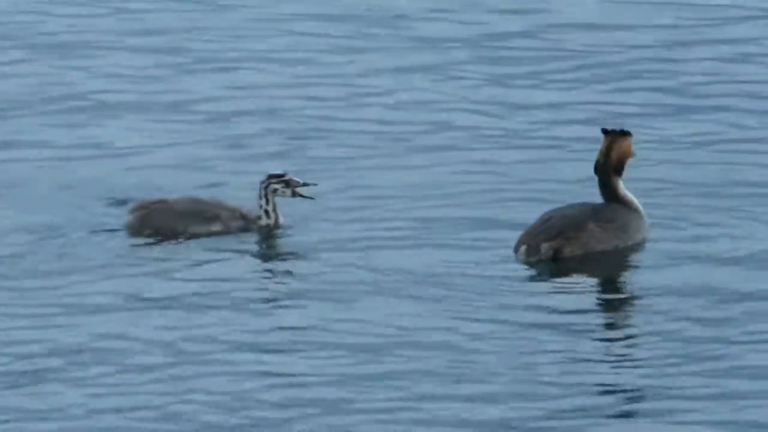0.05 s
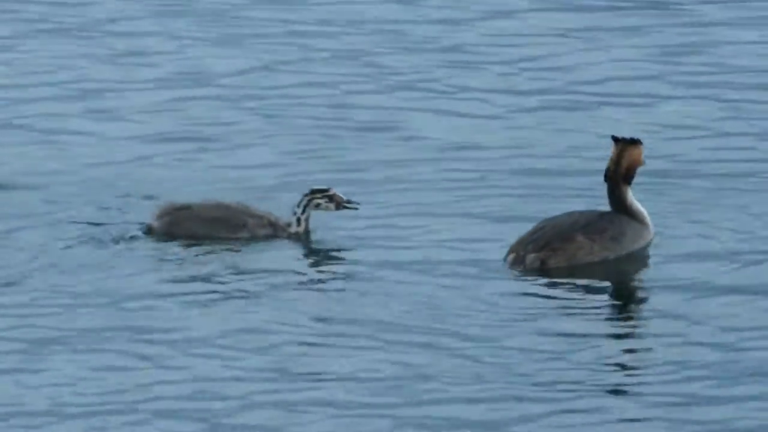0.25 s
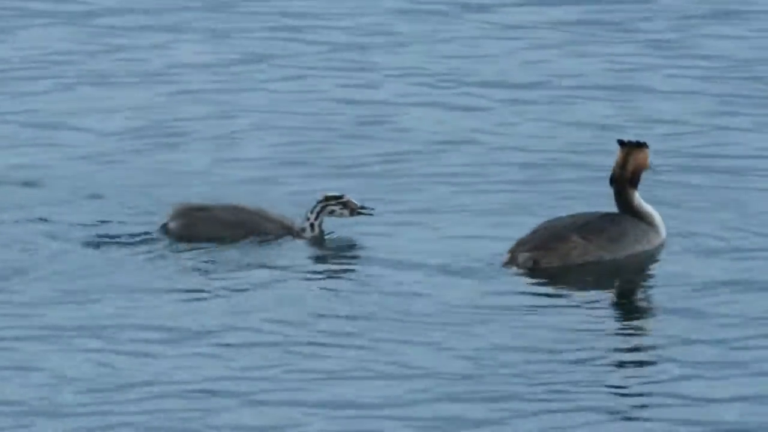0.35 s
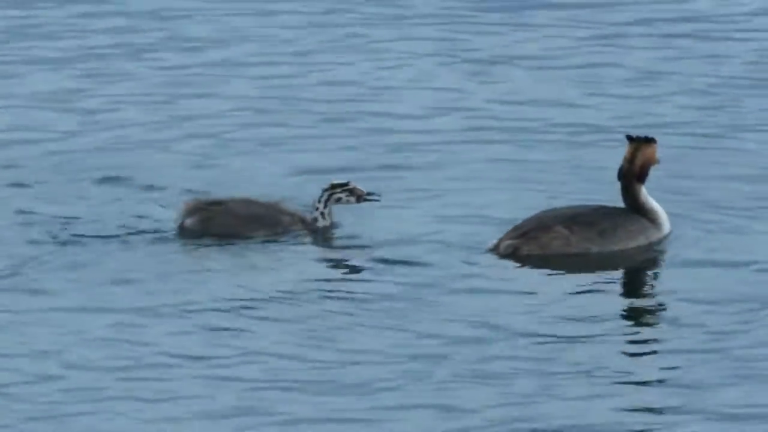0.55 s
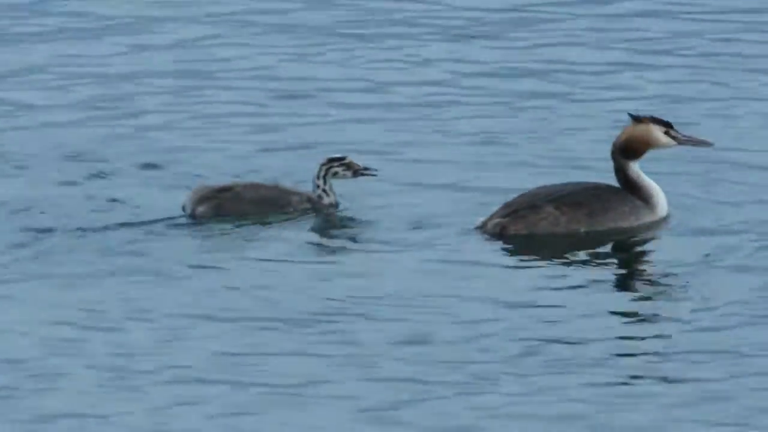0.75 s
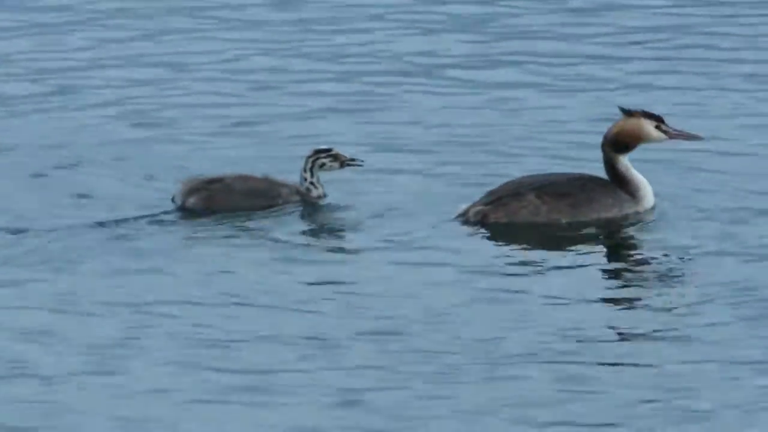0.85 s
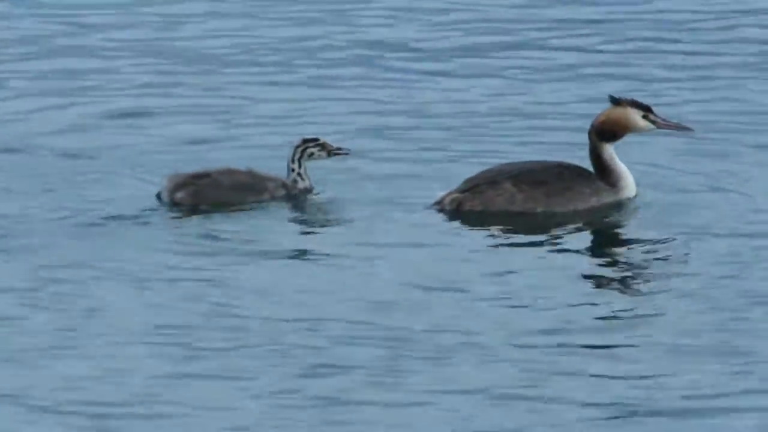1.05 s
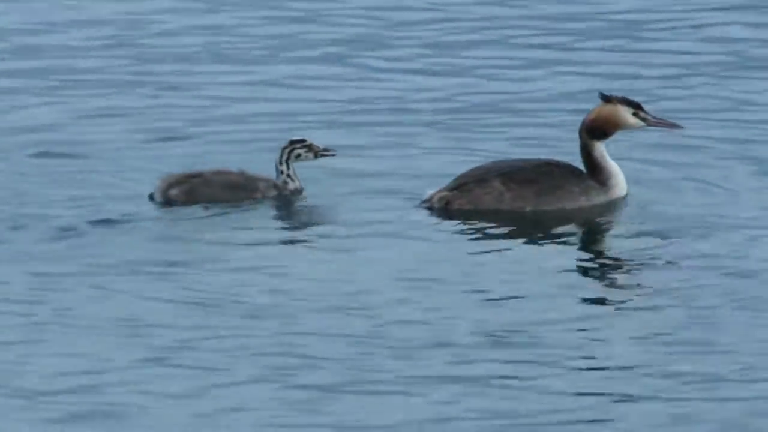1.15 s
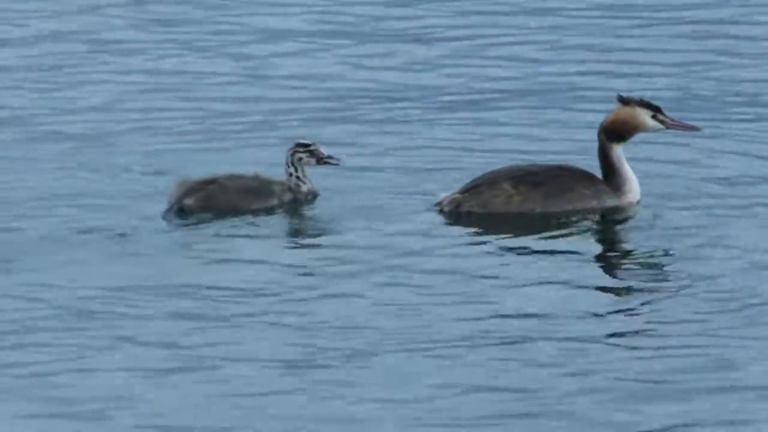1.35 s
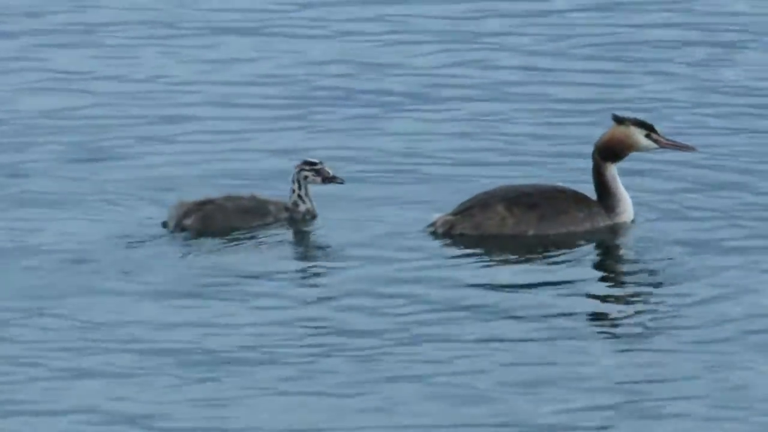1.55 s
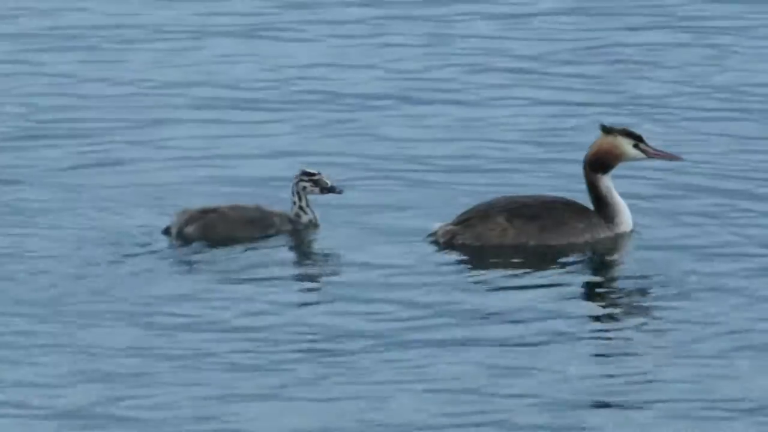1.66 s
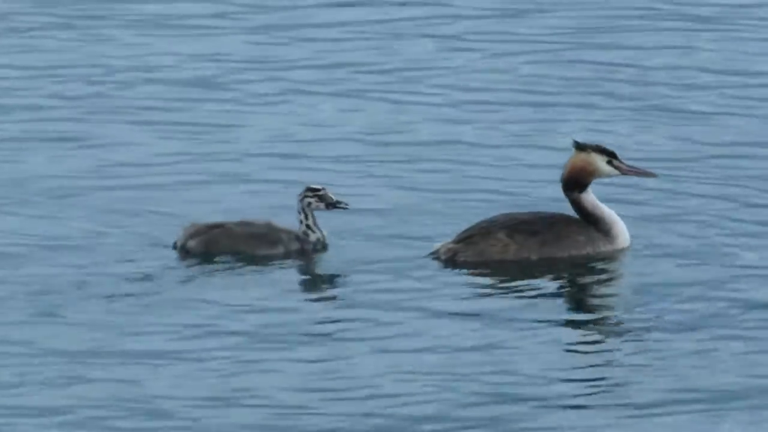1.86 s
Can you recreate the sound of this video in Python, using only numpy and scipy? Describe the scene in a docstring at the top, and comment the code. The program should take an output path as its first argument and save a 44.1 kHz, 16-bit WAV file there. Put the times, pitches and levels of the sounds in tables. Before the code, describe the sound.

A young waterbird peeps rapidly in high gliding calls while wind gusts thump the microphone on a lake

```python
"""A young waterbird peeps at once: its calls glide up, flip into higher registers and drop back.
Each note is a few sine partials on a drawn pitch, with a faint echo from the far shore of the lake.
Gusts thump the two microphone ports: filtered noise and short low wobbles over a deep rumble.
Nearby wavelets tick, plop and fizz as noise bursts and decaying sines.
Behind them lies a distant hush of water and air, made of smooth filtered noise."""
import sys
import numpy as np
from scipy import signal
from scipy.fft import rfft, irfft
from scipy.io import wavfile
from scipy.ndimage import uniform_filter1d

SR = 44100
rng = np.random.default_rng(int(sys.argv[2]) if len(sys.argv) > 2 else 0)


def bounce(signal):
    """Save signal as a 16-bit WAV file at the path given by the first command-line argument."""
    frames = np.transpose(np.atleast_2d(signal))
    limited = np.clip(frames, -1, 1)
    pcm = np.round(limited * 32767).astype(np.int16)
    wavfile.write(sys.argv[1], SR, pcm)


def gain_from_db(level_db):
    """Turn a decibel level (scalar or array-like) into a linear amplitude factor."""
    decades = np.asarray(level_db, float) / 20
    return 10 ** decades


N = 83790  # samples, 1.9 s

# Distant hush, tone of the common part: freq_hz, relative_db
HUSH_TONE = [(18, -54.5), (30, -19), (148, -4.5), (369, -5.5), (410, -3.5), (970, -5), (1050, -7),
             (1550, -10), (2020, -12), (9680, -42), (15500, -58)]
# Hush, left-right part against the common part: freq_hz, relative_db
HUSH_SIDE_TONE = [(60, -46.5), (110, -45), (200, -34.5), (380, -66), (700, -83), (1290, -23.5), (2380, -11),
                  (4400, -3.5), (8120, 1), (15000, 11)]
# Slow swell of the hush, also steering the scattered droplets: time_s, relative_db
SWELL_CURVE = [(0, 3), (.25, 2), (.33, 1.5), (.45, 4.5), (.6, 5.5), (.8, 4), (1.0, 4), (1.2, 4.5), (1.4, 3),
               (1.7, 2), (1.9, 1.5)]
# Treble tone shared by hush, fizz and water: freq_hz, gain_db
TREBLE_TONE = [(9000, 0), (12000, 4), (15000, -10.5), (16000, -30)]

# Soft fizz after wavelets break: peak_s, level_db, half_width_s (to 1/e)
FIZZ_PATCHES = [(.428, -59, 0.013), (.575, -60.5, 0.035), (.68, -58, 0.024), (.95, -61, .015),
                (1.17, -65.5, 0.013), (1.28, -66.5, 0.043)]
# Tone of the fizz: freq_hz, relative_db
FIZZ_TONE = [(2500, -20.5), (4500, 3), (14000, -16.5)]

# Water ticks close by, before the treble tone: start_s, level_db, centre_hz, rise_s (at least 0.0003)
WATER_TICKS = [(0.052, -62.5, 12000, 0.00086), (.058, -58, 12000, .0015), (.387, -67, 9000, 0.0011),
               (0.422, -57, 4940, 0.0012), (0.422, -56.5, 5550, .003), (0.484, -51, 4900, 0.0024),
               (0.54, -59, 6500, .001), (0.5522, -34.5, 2870, 0.00092), (.5525, -52, 10000, 0.0013),
               (0.557, -38.5, 3740, 0.0034), (0.561, -55.5, 9800, 0.0035), (.597, -39.5, 4700, 0.001),
               (0.596, -51, 12900, 0.0017), (0.601, -41.5, 10500, 0.00045), (0.628, -44, 2800, 0.0058),
               (.658, -60, 10000, .002), (0.673, -47.5, 4460, 0.0037), (0.949, -40, 2940, 0.0027),
               (1.089, -55.5, 4940, .003), (1.167, -53, 4700, 0.0035), (1.169, -62, 11000, .003),
               (1.635, -66, 6400, .002), (1.727, -56.5, 5500, 0.0056), (1.747, -62, 5560, .004),
               (1.777, -64, 10000, 0.0022)]
# Small bubbles, before the treble tone: start_s, peak_db, start_pitch_hz
BUBBLES = [(0.03, -30.5, 1223), (.204, -36, 1900), (0.427, -32, 992), (.544, -30, 1950),
           (.565, -30.5, 2560), (.811, -31.5, 2090), (0.95, -27.5, 1295), (1.014, -31, 1020),
           (1.089, -30, 1990), (1.159, -31, 1330), (1.191, -34, 1160), (1.4, -33, 2030),
           (1.428, -30.5, 850),]

# Strength of the gust, before its trim: time_s, relative_db
GUST_CURVE = [(0.0, -35), (0.074, -44.5), (0.21, -39), (0.248, -14), (0.312, -38), (0.332, -18),
              (0.444, -38.5), (0.486, -20), (0.55, -30.5), (0.592, -9), (0.618, -26.5), (0.788, -11.5),
              (0.888, -19), (0.904, -23.5), (0.984, -13), (1.01, -15.5), (1.316, -34.5), (1.344, -33.5),
              (1.406, -44), (1.422, -39), (1.48, -28), (1.528, -34), (1.57, -37), (1.608, -52),
              (1.852, -68), (1.9, -34.5)]
# Tone of the gust: freq_hz, relative_db
GUST_TONE = [(25, -53), (60, -41), (120, -6), (200, -2), (400, -5.5), (490, -4.5), (540, -31.5),
             (800, -38.5), (2500, -66), (6000, -98)]
# Wind, filter on the left-right part: freq_hz, gain_db
WIND_SIDE_TONE = [(60, -50), (125, -37.5), (250, -21.5), (500, -13), (1000, -3), (2500, 15)]
# Rough upper band of the gust, before its trim: time_s, relative_db
RASP_CURVE = [(0.0, -66), (0.226, -50), (0.254, -26.5), (0.284, -72.5), (0.332, -34.5), (0.46, -68),
              (0.492, -28.5), (0.528, -70), (0.598, -31.5), (0.618, -46), (0.718, -28.5), (0.74, -55),
              (0.82, -22.5), (0.952, -47.5), (1.062, -24), (1.11, -52), (1.18, -35.5), (1.2, -66.5),
              (1.418, -62.5), (1.434, -42), (1.46, -64), (1.9, -68.5)]
# Tone of that band: freq_hz, relative_db
RASP_TONE = [(400, -14.5), (500, 3), (700, 0), (900, -12), (1300, -29.5), (2500, -53.5), (6000, -88.5)]
# Deep rumble, before its trim: time_s, relative_db
RUMBLE_CURVE = [(0.0, -49.5), (0.508, -41.5), (0.544, -57), (0.612, -35), (0.824, -48.5), (0.866, -42),
                (1.518, -45), (1.56, -39), (1.598, -53.5), (1.9, -66.5)]
# Tone of the rumble: freq_hz, relative_db
RUMBLE_TONE = [(20, -37), (40, -12), (60, -1), (90, 5), (130, 6), (200, 1), (300, -48), (2000, -87)]
# Strongest thumps, before the thump tone: peak_s, peak_db, centre_hz, width_s (at half height)
PORT_THUMPS = [(0.0053, -23.5, 260, 0.0041), (0.1449, -28, 395, 0.0029), (0.244, -11, 340, 0.0034),
               (0.2559, -12.5, 305, 0.012), (0.293, -22.5, 260, 0.0078), (0.3381, -12, 420, 0.003),
               (0.3702, -18, 295, 0.0021), (0.42, -28, 238, 0.0072), (0.48, -17, 344, 0.0055),
               (0.4943, -13, 374, 0.006), (0.5243, -17, 248, 0.0048), (0.541, -12.5, 324, 0.0026),
               (0.5718, -12, 381, 0.0031), (0.5935, -9, 352, 0.0031), (0.61, -21, 330, 0.005),
               (0.6434, -11, 302.0, 0.0032), (0.6582, -23, 289, 0.027), (0.6652, -10.5, 312, 0.0044),
               (0.6961, -20, 272, 0.013), (0.7144, -9.5, 364, 0.0088), (0.731, -25, 280, 0.0042),
               (0.7427, -9.5, 390, 0.0052), (0.7647, -7, 381, 0.0035), (0.7831, -14.5, 291, 0.0055),
               (0.7932, -6.5, 401, 0.0049), (0.8235, -8, 370, 0.0026), (0.8366, -5.5, 289, 0.0014),
               (0.871, -18.5, 287, 0.0031), (0.9037, -7, 346, 0.0028), (0.9152, -10.5, 248, 0.0041),
               (0.9416, -10.5, 390, 0.0046), (1.0036, -17.5, 322, 0.012), (1.0157, -7.5, 277, 0.0052),
               (1.036, -13.5, 285, 0.0047), (1.0557, -9.5, 296, 0.0014), (1.0688, -4, 338, 0.0021),
               (1.109, -8, 342, 0.0029), (1.125, -14, 289, 0.0057), (1.1427, -16, 228.0, 0.0044),
               (1.1881, -26.5, 217, 0.0094), (1.2084, -15, 289, 0.002), (1.215, -25.5, 342, 0.0099),
               (1.255, -23, 226, 0.0039), (1.279, -30, 211.0, 0.0058), (1.302, -29, 300, 0.005),
               (1.3359, -19, 370, 0.0038), (1.3522, -17.5, 183, 0.0059), (1.3874, -22, 279, 0.0082),
               (1.398, -17.5, 313, 0.0028), (1.4573, -17.5, 244, 0.0031), (1.4801, -17, 243, 0.0052),
               (1.5646, -23.5, 291, 0.0032), (1.5743, -30.5, 211, 0.0052)]
# Sharp upper edges of the hardest thumps, before trim and thump tone: start_s, peak_db, centre_hz
THUMP_SLAPS = [(0.248, -29.5, 713), (0.333, -28.5, 832), (0.489, -30.5, 670), (0.702, -21, 773),
               (0.79, -19.5, 643), (0.856, -19.5, 657), (0.901, -18.5, 638), (1.014, -14.5, 600),
               (1.171, -30, 654)]
# Tone of thumps and slaps: freq_hz, gain_db
THUMP_TONE = [(30, -31.5), (70, -10), (130, 2.5), (490, -0.5), (560, -8.5), (900, -0.5), (1500, -31),
              (5000, -79)]

# Bird notes by register, a list of points per note: time_s, pitch_hz, level_db (before the partials)
LOW_CALLS = [
    [(0.0, 2050, -47), (0.008, 2204, -50), (0.024, 2420, -43), (0.03, 2580, -41)],
    [(0.253, 2274, -60), (0.257, 2220, -44.5), (0.264, 1888, -55)],
    [(0.368, 1561, -56), (0.382, 1880, -45.5), (0.398, 2105, -45.5), (0.42, 2435, -44)],
    [(0.503, 2142, -51), (0.509, 2136, -47.5), (0.531, 1979, -56), (0.548, 1767, -58), (0.568, 1404, -45)],
    [(0.678, 1921, -45.5), (0.698, 2133, -47), (0.712, 2406, -44), (0.718, 2580, -41)],
    [(0.795, 2222, -47), (0.813, 2061, -49.5), (0.833, 1910, -48.5), (0.855, 1750, -56)],
    [(0.902, 2020, -47), (0.908, 2204, -51.5), (0.914, 2364, -49), (0.921, 2630, -40.5)],
    [(0.998, 2230, -61), (1.02, 1870, -54), (1.035, 1895, -50), (1.05, 1870, -55)],
    [(1.155, 1970, -48), (1.161, 2047, -47), (1.19, 2565, -48.5)],
    [(1.253, 2323, -57), (1.283, 1947, -48.5), (1.305, 1880, -51.5), (1.312, 1819, -54)],
    [(1.432, 2055, -54), (1.44, 2270, -52), (1.451, 2510, -42)],
    [(1.678, 2530, -56), (1.684, 2230, -51), (1.694, 2060, -51), (1.702, 1880, -45)],
    [(1.856, 1681, -60), (1.866, 2030, -44), (1.88, 2360, -47), (1.887, 2550, -35.5)],
]
# Low notes that link two calls: time_s, pitch_hz, level_db
LINKING_CALLS = [
    [(0.113, 2376, -57), (0.119, 2288, -49), (0.149, 2280, -51), (0.181, 2122, -50), (0.199, 2147, -52.5),
     (0.221, 2486, -49), (0.226, 2580, -44)],
    [(1.502, 2410, -47.5), (1.542, 1874, -47), (1.556, 1503, -51), (1.572, 1550, -59), (1.588, 1902, -49),
     (1.61, 2007, -45), (1.62, 2323, -47.5), (1.629, 2570, -39)],
]
# Middle register: time_s, pitch_hz, level_db
MID_CALLS = [
    [(0.031, 3350, -38), (0.043, 3440, -38), (0.081, 3200, -38), (0.113, 2990, -51)],
    [(0.226, 3220, -40.5), (0.234, 3285, -37.5), (0.244, 3230, -37), (0.253, 2940, -47)],
    [(0.42, 3220, -38.5), (0.426, 3320, -31.5), (0.431, 3400, -56)],
    [(0.472, 3133, -36), (0.478, 3100, -35), (0.49, 2955, -43.5), (0.5, 2760, -52)],
    [(0.718, 3280, -38), (0.724, 3290, -37.5), (0.731, 3430, -52.5)],
    [(0.767, 3139, -41), (0.773, 3170, -35), (0.781, 2940, -44.5), (0.795, 2890, -45)],
    [(0.973, 3260, -37), (0.979, 3134, -34), (0.989, 3055, -45), (0.997, 2970, -45)],
    [(1.191, 3090, -39), (1.203, 3166, -33.5), (1.236, 3050, -38.5), (1.255, 2860, -52)],
    [(1.451, 3230, -39), (1.457, 3293, -37.5), (1.481, 3212, -35.5), (1.502, 2980, -44.5)],
    [(1.629, 3220, -41), (1.635, 3250, -33), (1.642, 3440, -53)],
    [(1.659, 3120, -33), (1.667, 3020, -39), (1.678, 2840, -47)],
    [(1.887, 3430, -39), (1.891, 3300, -43.5), (1.9, 3350, -32)],
]
# High register: time_s, pitch_hz, level_db
HIGH_CALLS = [
    [(0.431, 3815, -37.5), (0.441, 3820, -32), (0.461, 3700, -31), (0.472, 3520, -38)],
    [(0.731, 3740, -40.5), (0.737, 3786, -36), (0.757, 3679, -34.5), (0.767, 3610, -38)],
    [(0.922, 3740, -36), (0.936, 3844, -41), (0.964, 3700, -35), (0.973, 3510, -36.5)],
    [(1.642, 3710, -36), (1.65, 3630, -31), (1.659, 3540, -40)],
]
# Sine partials of each register: multiple of the pitch, relative_db
LOW_SINES = [(1, 4.5), (2, -7.5), (3, -44)]
MID_SINES = [(1, 2), (1.5, -23.5), (2, -33)]
HIGH_SINES = [(1, -1.5), (2, -48)]
# Extra strength of the overtones, one value per note: gain_db
LOW_BRIGHTNESS = [4.5, -4, -1.5, -4, -1, -5, 1, -5, -2, -5, 0, -4.5, -3, -1, -2]
MID_BRIGHTNESS = [7, -6, -2, -8, -2, -6, -6, -8, -5, -2, -2, -2]
# Throat resonance, on the overtones alone: freq_hz, gain_db
THROAT_TONE = [(3400, -14.5), (3900, 4), (4300, 5.5), (4700, 0), (5050, -11), (7000, -5)]


def curve(table, col=1):
    """A table column as one value per sample."""
    a = np.array(table, float)
    return np.interp(np.arange(N) / SR, a[:, 0], a[:, col])


def colour(x, *tables):
    """Filter by the sum of tables in Hz and dB, joined on a log frequency scale."""
    log_hz = np.log(np.fft.rfftfreq(N, 1 / SR) + 1)
    db = 0
    for table in tables:
        hz, gain_db = np.array(table).T
        db = db + np.interp(log_hz, np.log(hz), gain_db)
    return irfft(rfft(x) * gain_from_db(db), N)


def unit(x):
    """Scale to rms 1."""
    return x / np.sqrt(np.mean(x ** 2))


def walk(rate):
    """Smoothed noise of rms 1; a higher rate in Hz wanders faster."""
    k = int(SR / rate)
    smooth = uniform_filter1d(rng.standard_normal(N), k)
    return unit(uniform_filter1d(smooth, k))


def add(out, s, x):
    """Mix x in from time s."""
    i = int(s * SR)
    out[..., i:i + x.shape[-1]] += x[..., :max(N - i, 0)]


def spread(mid, side):
    """Left and right from the common and the left-right part."""
    return np.array([mid + side, mid - side])


def layer(table, tone, db, grit=1):
    """Coloured noise that follows a level curve, roughened by grit; its rms is the curve's plus db."""
    gain = gain_from_db(curve(table))
    noise = unit(colour(gain * grit * rng.standard_normal(N), tone))
    return gain_from_db(db) * np.sqrt(np.mean(gain ** 2)) * noise


def grain(hz, cycles, glide):
    """A decaying sine with a soft start, peak 1 at a third of its cycles; glide raises the pitch."""
    u = np.arange(int(3 * cycles / hz * SR)) * hz / SR / cycles
    shape = u * np.exp(1 - 3 * u) * 3
    return shape * np.sin(2 * np.pi * cycles * (u + glide * u ** 2 / 2))


def tick(hz, length):
    """A burst of noise around hz that peaks after length seconds and dies away, partly differing by side."""
    u = np.arange(1024) / SR / max(length, 3e-4)
    octaves = np.log2((np.fft.rfftfreq(1024, 1 / SR) + 1) / hz)
    band = np.exp(-.5 * (octaves / 0.42) ** 2)
    noise = irfft(rfft(rng.standard_normal((2, 1024))) * band) / np.sqrt(np.mean(band ** 2))
    mid, side = noise * u * np.exp(1 - u)
    return spread(mid, .6 * side)


def hush():
    """Distant water and air: smooth noise with a slow swell and a slight flicker."""
    flicker_db = .8 * walk(42)
    mid, side = rng.standard_normal((2, N)) * gain_from_db(curve(SWELL_CURVE) + flicker_db)
    norm = np.std(colour(rng.standard_normal(N), HUSH_TONE))
    mid = colour(mid, HUSH_TONE, TREBLE_TONE)
    side = colour(side, HUSH_TONE, HUSH_SIDE_TONE)
    return gain_from_db(-45.5) / norm * spread(mid, side)


def fizz():
    """Grainy treble noise that rises and fades in bell-shaped patches."""
    t = np.arange(N) / SR
    patches = sum(gain_from_db(db) * np.exp(-((t - s) / width) ** 2) for s, db, width in FIZZ_PATCHES)
    mid, side = (unit(colour(rng.standard_normal(N), FIZZ_TONE, TREBLE_TONE)) for _ in range(2))
    return patches * gain_from_db(2 * walk(200)) * spread(mid, .6 * side)


def water():
    """Wavelets close by: noise ticks, ringing bubbles, and faint laps and spray that follow the swell."""
    laps_per_s, lap_db = 300, -54
    spray_per_s, spray_db = 240, -82.5
    size_spread_db = 3
    out, swell_db = np.zeros((2, N)), 2.26 * curve(SWELL_CURVE)
    for s, db, hz, length in WATER_TICKS:
        add(out, s, gain_from_db(db) * tick(hz, length))
    for s, db, hz in BUBBLES:
        add(out, s, gain_from_db(db) * grain(hz, cycles=8.9, glide=0.027)[None])
    # chance size: many weak drops, few strong ones
    for when, pitch, size, pan in rng.random((int(laps_per_s * N / SR), 4)):
        db = lap_db + swell_db[int(when * N)] - size_spread_db * np.log(1 - .97 * size)
        lap = gain_from_db(db) * grain(900 * 3.5 ** pitch, cycles=4.3, glide=0.18)
        add(out, when * N / SR, spread(lap, .4 * (pan - .5) * lap))
    for when, pitch, size in rng.random((int(spray_per_s * N / SR), 3)):
        db = spray_db + swell_db[int(when * N)] - size_spread_db * np.log(1 - .97 * size)
        add(out, when * N / SR, gain_from_db(db) * tick(3500 * 2.5 ** pitch, 0.0023))
    return colour(out, TREBLE_TONE)


def buffets():
    """Eddies of uneven size: chance hits smeared over 300 samples into a rough gain of rms 1."""
    hits_per_s, size_spread_db = 470, 3.5
    hit = (rng.random(N) < hits_per_s / SR) * gain_from_db(size_spread_db * rng.exponential(size=N))
    return unit(np.abs(uniform_filter1d(hit, size=300)) ** .5)


def port_thumps():
    """The biggest eddies: bell-shaped low wobbles with a chance phase at each port, and sharp slaps."""
    thumps, u = np.zeros((2, N)), np.arange(-900, 900) / SR
    for s, db, hz, width in PORT_THUMPS:
        bell = gain_from_db(db) * np.exp(-4 * np.log(2) * (u / width) ** 2)
        wobble = np.sin(2 * np.pi * (hz * u + rng.random((2, 1))))
        rough = gain_from_db(-15.5) * rng.standard_normal((2, len(u)))
        # a bell that would start before time 0 is shifted to start there
        add(thumps, max(s + u[0], 0), bell * (wobble + rough))
    for s, db, hz in THUMP_SLAPS:
        add(thumps, s, gain_from_db(db - 1.5) * grain(hz, cycles=5.2, glide=0)[None])
    return colour(thumps, THUMP_TONE)


def wind():
    """Gust noise and thumps at the two microphone ports over a deep rumble common to both."""
    hit = buffets()
    pair = np.array([layer(GUST_CURVE, GUST_TONE, -5, hit) + layer(RASP_CURVE, RASP_TONE, -2.5, hit)
                     for _ in range(2)])
    mid, other = pair + port_thumps()
    rumble = layer(RUMBLE_CURVE, RUMBLE_TONE, 4.5)
    return spread(mid + rumble, colour(other, WIND_SIDE_TONE))


def peep(note, partials, bright_db, waver, shaky_db):
    """One note: sine partials on a gliding pitch, the overtones shaped by the throat."""
    t, edge_s = np.arange(N) / SR, 0.0062
    gate = np.clip(np.minimum(t - note[0][0], note[-1][0] - t) / edge_s + .5, 0, 1)
    hz = uniform_filter1d(curve(note), size=90) * waver
    phase = 2 * np.pi * np.cumsum(hz) / SR
    tone = np.zeros(N)
    for k, db in partials:
        if k > 1:
            db = db + np.interp(k * hz, *np.array(THROAT_TONE).T) + shaky_db + bright_db
        tone += gain_from_db(db) * np.sin(k * phase)
    return gate * gain_from_db(curve(note, col=2)) * np.sqrt(2) * tone


def far_shore():
    """Impulse response of the lake: a decaying noise tail plus a smeared return from the shore."""
    t60_s, tail_db = .45, -22
    delay_s, smear_s, shore_db = .085, 0.033, -22.5
    t = np.arange(SR // 2) / SR
    tail = rng.standard_normal((1, len(t))) * gain_from_db(-60 * t / t60_s)
    tail *= gain_from_db(tail_db) / np.sqrt(np.sum(tail ** 2))
    shore = rng.standard_normal(tail.shape) * np.exp(-((t - delay_s) / smear_s) ** 2)
    return tail + gain_from_db(shore_db) * shore / np.sqrt(np.sum(shore ** 2))


def chick():
    """The bird's three registers with shared waver and flutter, slightly off centre, and their echo."""
    waver, flutter = 1 + .003 * walk(170), gain_from_db(1 * walk(120))
    shaky_db = 3 * walk(90)
    registers = ((LOW_CALLS + LINKING_CALLS, LOW_SINES, LOW_BRIGHTNESS),
                 (MID_CALLS, MID_SINES, MID_BRIGHTNESS),
                 (HIGH_CALLS, HIGH_SINES, np.zeros(len(HIGH_CALLS))))
    voice = np.zeros(N)
    for notes, partials, brightness in registers:
        for note, bright_db in zip(notes, brightness):
            voice += peep(note, partials, bright_db, waver, shaky_db)
    voice *= flutter
    direct = spread(voice, gain_from_db(-22.5) * np.roll(voice, 3))
    echo = signal.fftconvolve(voice[None], far_shore(), axes=1)[:, :N]  # the same on both sides
    return direct + echo


def scene():
    """Hush, fizz, water, wind and bird together."""
    return hush() + fizz() + water() + wind() + chick()


def low_pass(x):
    """Removes everything above the highest recorded frequency."""
    return signal.sosfilt(signal.butter(12, 15700, fs=SR, output="sos"), x)


def record(dry):
    """The finished stereo mix, with no further level change."""
    return low_pass(dry)


dry = scene()
out = record(dry)
bounce(out)
```